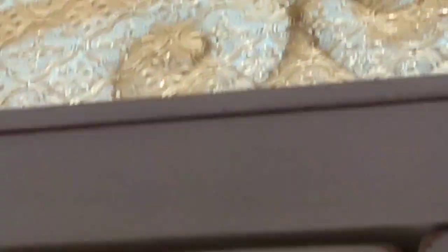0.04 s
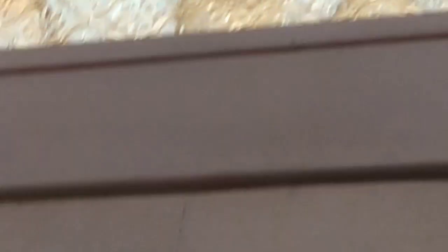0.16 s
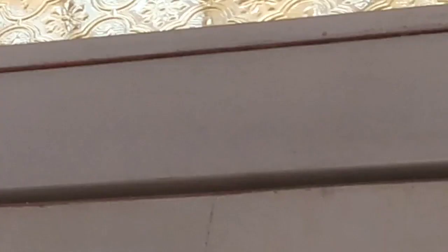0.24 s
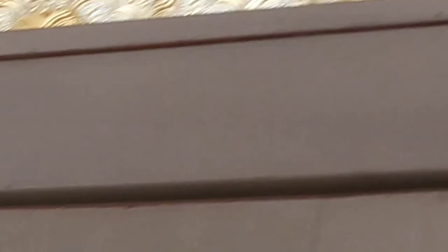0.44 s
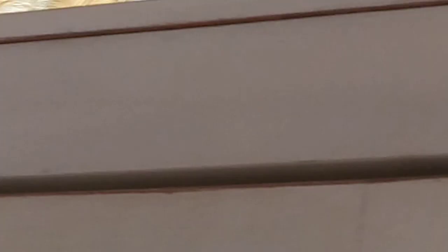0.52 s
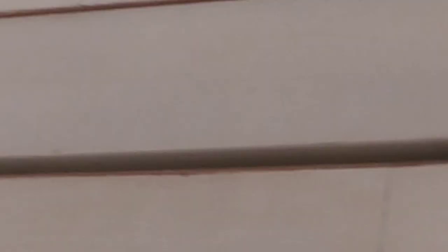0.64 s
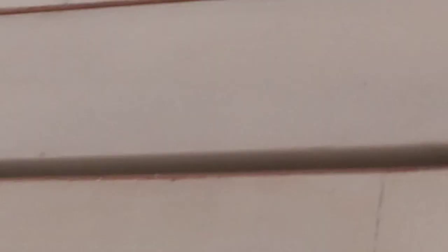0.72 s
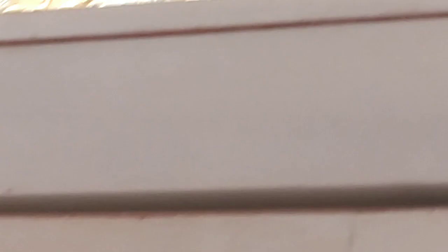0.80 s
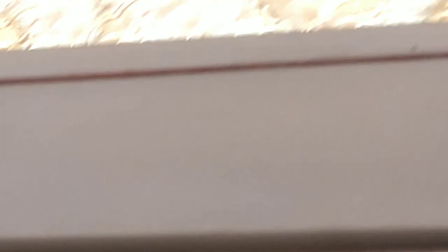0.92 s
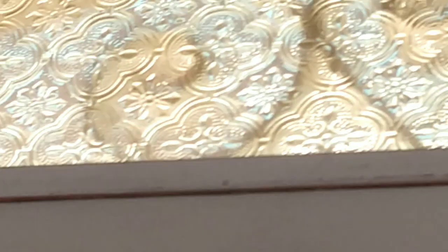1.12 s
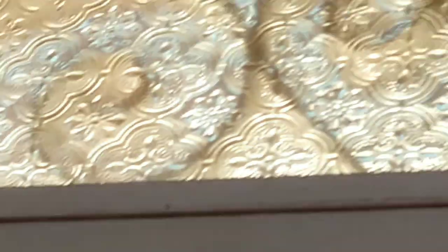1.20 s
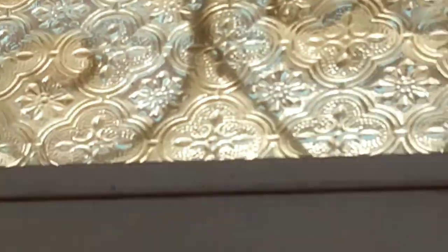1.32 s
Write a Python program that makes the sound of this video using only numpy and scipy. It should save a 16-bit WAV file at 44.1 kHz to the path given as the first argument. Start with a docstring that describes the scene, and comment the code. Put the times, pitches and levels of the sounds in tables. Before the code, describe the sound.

A low thump from a bumped camera is the main sound. Faint hand rustle and rumble open, close to the microphone. At about 0.25 seconds comes the quick double thump, with a short hollow knock and a bright, gritty scuff near 0.3 seconds. The bass dies away by roughly 0.7 seconds. A few faint grip rustles follow until 1.2 seconds, over steady quiet room noise and electrical hum.

```python
"""A faint rustle and rumble of a hand on a camera, over mains hum and room noise. Then the camera is
bumped: a low double thump, a short hollow knock and a brief bright scuff. The impacts excite damped
modes of its body, and sliding friction makes the scuff's grainy noise. The room's bass resonances
ring on, and a few more faint rustles of the grip follow."""
import sys
import numpy as np
from scipy import signal
from scipy.fft import rfft, irfft
from scipy.io import wavfile
from scipy.ndimage import map_coordinates

SR = 44100
rng = np.random.default_rng(int(sys.argv[2]) if len(sys.argv) > 2 else 0)


def wav_record(signal):
    """Record a signal, one row per channel, as 16-bit PCM in the file named by sys.argv[1]."""
    frames = np.transpose(np.atleast_2d(signal))
    bounded = np.clip(frames, -1, 1)
    # unit amplitude maps onto the largest positive 16-bit level
    quanta = np.round(bounded * 32767).astype(np.int16)
    wavfile.write(sys.argv[1], SR, quanta)


N = 59535
FFT_SIZE = 72000


def amp(db):
    """Decibels to amplitude ratio."""
    return np.exp(np.asarray(db) * (np.log(10) / 20))


def unit_rms(x):
    """Normalisation to rms 1."""
    return x / np.sqrt(np.mean(x ** 2) + 1e-20)


def along(points, hz):
    """Interpolation of (frequency_hz, value) points on a log frequency axis."""
    point_hz, values = np.transpose(points)
    return np.interp(np.log(hz + 1), np.log(point_hz + 1), values)


def since(start_s):
    """Elapsed seconds, zero before the start."""
    return np.maximum(np.arange(N) / SR - start_s, 0)


def filtered(x, response):
    """Linear filtering: the spectrum times a frequency response."""
    hz = np.fft.rfftfreq(FFT_SIZE, 1 / SR)
    return irfft(rfft(x, FFT_SIZE) * response(hz), FFT_SIZE)[..., :N]


def stereo(pair, correlation, spectrum=((1, 0), (2, 0))):
    """Mid-side mixing: two uncorrelated signals become a left and right of given correlation."""
    def response(hz):
        likeness = np.clip(along(correlation, hz), -.995, .995)
        return amp(along(spectrum, hz)) * np.sqrt(np.array([1 + likeness, 1 - likeness]) / 2)
    mid, side = filtered(pair, response)
    return np.array([mid + side, mid - side])


def noise(spectrum, correlation):
    """Spectrally shaped stereo noise of rms 1."""
    return unit_rms(stereo(rng.standard_normal((2, N)), correlation, spectrum))


def wobble(rate_hz):
    """Random modulation: a spline through rate_hz random values a second."""
    return map_coordinates(rng.standard_normal(size=2048), [np.arange(N) * rate_hz / SR + 2])


def envelope(start_s, level_db, attack_s, hold_s, t60_s):
    """Linear attack, hold and exponential decay."""
    decay_db = 60 * since(start_s + attack_s + hold_s) / t60_s
    return amp(level_db - decay_db) * np.minimum(since(start_s) / attack_s, 1)


def damped_mode(start_s, hz, level_db, rise_s, t60_s):
    """A damped oscillator: a sinusoid that builds up and decays exponentially."""
    t = since(start_s)
    return amp(level_db - 60 * t / t60_s) * np.sin(2 * np.pi * hz * t) * (1 - np.exp(-t / rise_s))


# Hum partials: pitch_hz, level_db
HUM_PARTIALS = [(100.2, -62), (226, -79.5), (296, -77), (344.5, -75.5), (544, -84.5), (678, -76)]
# Change of the hum as the camera moves: time_s, gain_db
HUM_GAIN = [(0.0, 4), (0.2, 2.5), (0.6, 0), (1.35, 0)]
# Room noise spectrum: frequency_hz, relative_db
AIR_SPECTRUM = [(20, -49), (32, -21), (48, -5.5), (70, -5.5), (104, -8.5), (124, -14), (192, -19.5),
                (240, -14), (340, -18), (390, -18), (680, -18.5), (1250, -19), (2600, -30), (5000, -38.5),
                (10800, -37.5), (15500, -46)]
# Left-right likeness of the room noise: frequency_hz, correlation
AIR_CORRELATION = [(60, 0.82), (150, 0.86), (300, 0.57), (600, 0.44), (1100, -0.09), (2500, 0.02),
                   (12000, -0.096)]

def room_tone():
    """Mains hum, a line spectrum with slight phase modulation, over steady broadband noise."""
    t = since(0)
    waver_rad_per_hz = 0.0011
    hum = np.zeros(N)
    for hz, level_db in HUM_PARTIALS:
        phase = 2 * np.pi * hz * t + waver_rad_per_hz * hz * wobble(7.32)
        hum += amp(level_db) * np.sqrt(2) * np.sin(phase)
    hum_gain = amp(np.interp(t, *np.transpose(HUM_GAIN)))
    return hum_gain * hum + amp(-59) * noise(AIR_SPECTRUM, AIR_CORRELATION)


# Reverberation time of the room: frequency_hz, t60_s
ROOM_DECAY = [(60, 0.38), (200, 0.7), (800, 0.72), (4000, 0.47), (12000, 0.74)]
# Left-right likeness of the handling noises and reverberation: frequency_hz, correlation
NEAR_CORRELATION = [(100, 0.99), (300, 0.69), (600, 0.76), (1100, -0.076), (2500, 0.03), (7000, -0.035),
                    (14000, 0.019)]

def reverberation(x):
    """Convolution with a diffuse tail in which each frequency decays at its own rate."""
    hz, t, bands = signal.stft(rng.standard_normal((2, SR)), SR, nperseg=512)
    decay = amp(-60 * t / along(ROOM_DECAY, hz)[:, None])
    tail = signal.istft(bands * decay, SR, nperseg=512)[1]
    wet = signal.fftconvolve(x[None], tail / np.linalg.norm(tail[0]), axes=1)[:, :N]
    return stereo(wet, NEAR_CORRELATION)


def friction(strokes, spectrum, grain_db):
    """Sliding friction: strokes of noise, made grainy by fast random amplitude modulation."""
    grains = unit_rms(amp(grain_db * wobble(700)) * noise(spectrum, NEAR_CORRELATION))
    return sum(envelope(*row) for row in strokes) * grains


# Rustles of the grip: start_s, level_db, attack_s, hold_s, t60_s
GRIP_RUSTLES = [(0.0, -66, 0.0024, 0.24, .5), (0.43, -76.5, .03, 0.23, 0.55),
                (0.71, -67, .032, 0.0046, 0.51), (0.767, -72.5, .005, .006, 0.46),
                (1.056, -72, .008, .006, 0.17), (1.135, -70, 0.034, .008, 0.13)]
# Rustle spectrum: frequency_hz, relative_db
RUSTLE_SPECTRUM = [(1000, -7.5), (3000, -2), (5500, -1.5), (8000, 0), (11000, -3), (15500, -9)]
# One finger slip: start_s, level_db, attack_s, hold_s, t60_s
FINGER_SLIP = (0.856, -63.3, .006, .011, .13)
# Thin hiss of the slip: frequency_hz, relative_db
SLIP_SPECTRUM = [(3000, -20), (6000, -8), (7000, 2), (9500, -2.5), (11500, -12), (15500, -13)]
# Handling rumbles: start_s, level_db, attack_s, hold_s, t60_s
GRIP_RUMBLES = [(0.0, -62, 0.0059, 0.25, 0.61), (0.423, -60.5, 0.068, 0.3, 0.79)]
# Rumble spectrum: frequency_hz, relative_db
RUMBLE_SPECTRUM = [(25, -33), (50, 10.5), (80, -7), (110, -6), (150, -23), (400, -38)]

def grip():
    """Handling noise: friction under a fluttering grip pressure, one slip and a low rumble."""
    flutter = amp(1.5 * wobble(90))
    rustle = flutter * friction(GRIP_RUSTLES, RUSTLE_SPECTRUM, grain_db=1)
    slip = envelope(*FINGER_SLIP) * noise(SLIP_SPECTRUM, NEAR_CORRELATION)
    rumble = sum(envelope(*row) for row in GRIP_RUMBLES) * noise(RUMBLE_SPECTRUM, NEAR_CORRELATION)
    return rustle + slip + rumble


# Bass modes of the room: start_s, pitch_hz, level_db, rise_s, t60_s
ROOM_MODES = [(0.233, 70, -42, .003, .16), (0.2719, 62.6, -47, 0.024, 1.5),
              (0.276, 83.5, -38.5, 0.0047, 0.32), (0.303, 126.6, -42, .07, .55),
              (0.3045, 157.1, -35.5, .0055, 0.31), (0.321, 197.7, -48, 0.068, .5),
              (0.3113, 234.5, -43, 0.01, 0.26)]
# Diffuse rumble after the bump: start_s, level_db, attack_s, hold_s, t60_s
DIFFUSE_RUMBLE = (0.33, -52.5, .04, .04, .33)
# Its spectrum: frequency_hz, relative_db
DIFFUSE_SPECTRUM = [(60, -14), (110, -2), (150, 0), (200, -7), (255, -5), (360, -15), (600, -32),
                    (1500, -70)]

def room_boom():
    """Room resonance: bass modes build up behind the thump and outlast it, in a diffuse rumble."""
    modes = sum(damped_mode(*row) for row in ROOM_MODES)
    return modes + envelope(*DIFFUSE_RUMBLE) * noise(DIFFUSE_SPECTRUM, NEAR_CORRELATION)


# Catches within the scrape: start_s, level_db, attack_s, hold_s, t60_s
CATCH_TICKS = [(0.3045, -49.5, .0005, .003, .015), (0.3207, -51.5, .0005, .002, .015)]
# Tick spectrum: frequency_hz, relative_db
CATCH_SPECTRUM = [(1500, -18), (3500, -6), (5200, 2), (8000, -2), (13000, -4), (15500, -9)]

def catches():
    """Friction transients: the scrape catches twice with a crisp tick."""
    return friction(CATCH_TICKS, CATCH_SPECTRUM, grain_db=1)


# Rubbing contacts: start_s, level_db, attack_s, hold_s, t60_s
SCUFF_STROKES = [(0.243, -57, 0.026, 0.03, 0.13), (0.299, -43.5, 0.007, 0.0034, 0.081),
                 (0.317, -52.5, 0.0055, 0.0032, 0.28)]
# Scuff spectrum: frequency_hz, relative_db
SCUFF_SPECTRUM = [(500, -5), (1400, -6), (2200, 0), (3100, -2), (3900, -5), (5200, -2.5), (7500, -5),
                  (10000, -6), (13000, -10.5), (15500, -16.5)]

def scuff():
    """Friction noise: a light slide ends in a bright, gritty double scrape."""
    direct = friction(SCUFF_STROKES, SCUFF_SPECTRUM, grain_db=1.5)
    return direct + amp(-4.5) * reverberation(direct[0])


# Hollow knock: start_s, level_db, attack_s, hold_s, t60_s
KNOCK_ENVELOPE = (0.2735, -43, .0075, .012, .09)

def knock():
    """A damped resonance that sinks quickly in pitch, roughened by phase and amplitude modulation."""
    rest_hz, bend_hz, settle_s = 562, 440, .0098
    flutter_db, flutter_rad, flutter_hz = 2.2, .6, 330
    t = since(KNOCK_ENVELOPE[0])
    cycles = rest_hz * t + bend_hz * settle_s * (1 - np.exp(-t / settle_s))
    phase = 2 * np.pi * cycles + flutter_rad * wobble(flutter_hz)
    ring = envelope(*KNOCK_ENVELOPE) * amp(flutter_db * wobble(flutter_hz)) * np.exp(1j * phase)
    return out_of_step(ring) + amp(-4) * reverberation(ring.imag)


# Left-right likeness of the knock: frequency_hz, correlation
KNOCK_CORRELATION = [(400, 0.98), (900, 0.28)]

def out_of_step(ring):
    """Phase difference between the two microphones, mixed from the ring's sine and cosine parts."""
    return stereo(np.array([ring.imag, ring.real]), KNOCK_CORRELATION)


# Contacts of the bump: start_s, level_db, push_pitch_hz, rattle_db
IMPACTS = [(0.232, -41, 294, -42), (0.2411, -31.5, 167, -47), (0.2736, -37, 330, -54),
           (0.3024, -26, 68, -61)]
# Modes of the camera body: pitch_hz, relative_db, t60_s
BODY_MODES = [(78.1, -18.2, .52), (133.2, 1.7, 0.097), (148, 1.4, 0.056), (184, 3, .25), (246, -5.5, 0.06),
              (311.4, -8.5, 0.21), (341, 1.2, 0.079), (419, -8, 0.2), (557, -12, .09)]
# Rattle spectrum: frequency_hz, relative_db
RATTLE_SPECTRUM = [(200, 10.5), (450, 0.5), (950, -0.5), (1600, -6), (2400, -19.5), (6000, -20),
                   (15000, -36.5)]

def thump():
    """Impact excitation: each contact rings the modes near the pitch of its push, with a short rattle."""
    spread_octaves = 0.88
    ring, rattle_envelope = np.zeros(N), np.zeros(N)
    for start_s, level_db, push_hz, rattle_db in IMPACTS:
        for hz, mode_db, t60_s in BODY_MODES:
            share = 1 / (1 + (np.log2(hz / push_hz) / spread_octaves) ** 4)
            ring -= share * damped_mode(start_s, hz, level_db + mode_db, rise_s=0.0027, t60_s=t60_s)
        rattle_envelope += envelope(start_s, rattle_db, attack_s=0.00078, hold_s=0.0015, t60_s=0.089)
    rattle = rattle_envelope * noise(RATTLE_SPECTRUM, NEAR_CORRELATION)
    return ring + rattle + reverberation(amp(-16) * ring + amp(-2.5) * rattle[0])


# Level difference between the channels: frequency_hz, left_minus_right_db
STEREO_BALANCE = [(70, 2), (300, 1.1), (1000, 0.5), (2200, -3), (4500, -0.5), (8000, 2.5), (13000, 2.5)]

def scene():
    """Superposition: the bump and handling sounds, panned by frequency, over the room tone."""
    near = thump() + room_boom() + knock() + scuff() + catches() + grip()
    panned = filtered(near, lambda hz: amp(np.outer([1, -1], along(STEREO_BALANCE, hz)) / 2))
    return panned + room_tone()


def record(dry):
    """Band limiting: the camera rolls off the deep bass and passes nothing above its upper limit."""
    low_cut_hz, top_hz = 32, 15650
    return filtered(dry, lambda hz: (hz < top_hz) * (1 - 1 / (1 + (hz / low_cut_hz) ** 4)))


dry = scene()
out = record(dry)
wav_record(out)
```